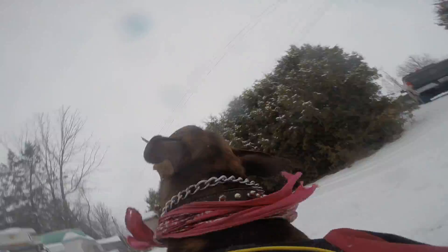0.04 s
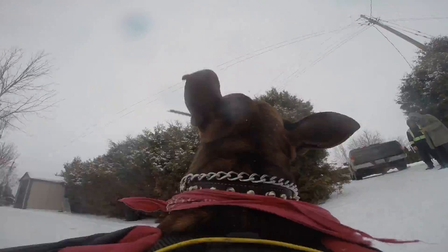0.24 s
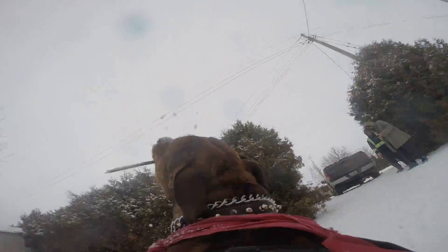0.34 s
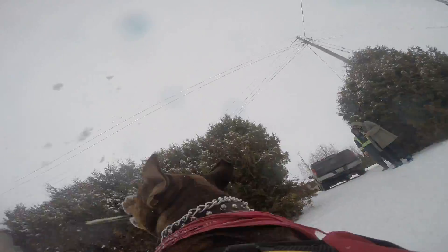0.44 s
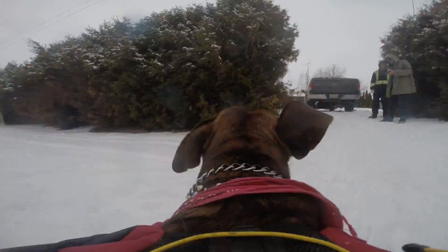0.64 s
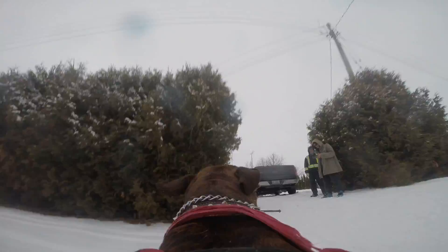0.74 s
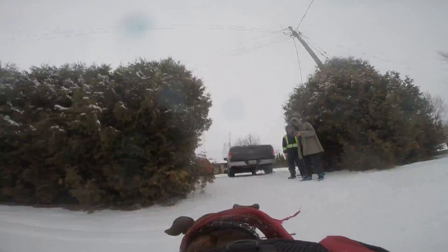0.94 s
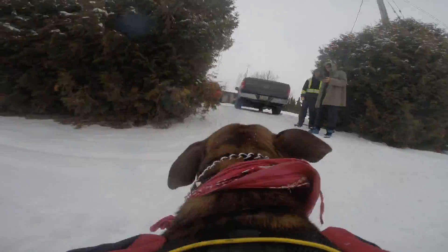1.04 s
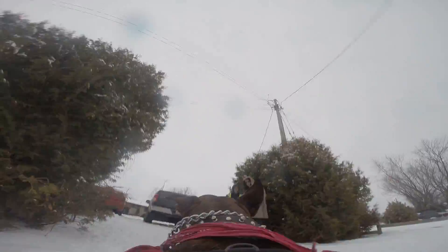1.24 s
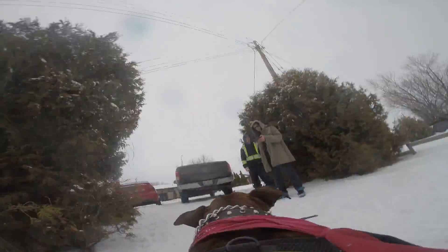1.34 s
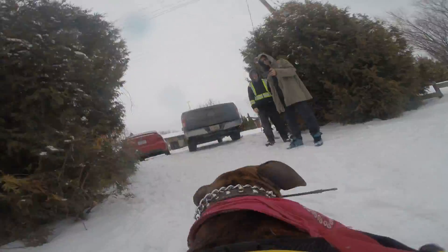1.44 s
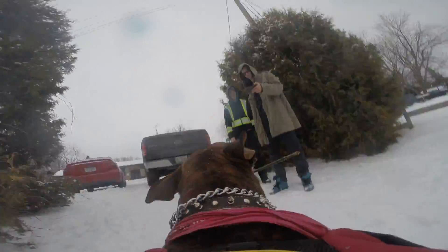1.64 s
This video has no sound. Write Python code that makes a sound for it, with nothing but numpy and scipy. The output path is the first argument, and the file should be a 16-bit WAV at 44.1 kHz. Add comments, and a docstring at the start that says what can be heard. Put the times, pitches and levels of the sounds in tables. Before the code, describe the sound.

Close thumps, knocks and harness rubbing from a camera riding on a moving dog.

```python
"""Rubbing, air rumble and deep thumps from a camera strapped to a dog trotting over snow.
Harness and fur rub on the plastic housing while air buffets the microphone.
Each stride jolts the mount; chain links tick lightly, and mount and chain collar
knock on the housing, ringing its modes."""
import sys
import numpy as np
from scipy import signal
from scipy.fft import rfft, irfft
from scipy.io import wavfile
from scipy.ndimage import uniform_filter1d, minimum_filter1d

SR = 44100
rng = np.random.default_rng(int(sys.argv[2]) if len(sys.argv) > 2 else 0)


def inscribe(sig):
    """Save sig as 16-bit PCM at rate SR to the path in sys.argv[1].

    A 1-D sig is mono; a 2-D sig holds one channel per row.
    Samples are clipped to [-1, 1] before scaling.
    """
    pcm = np.round(np.clip(np.atleast_2d(sig).T, -1, 1) * 32767)
    wavfile.write(sys.argv[1], SR, pcm.astype(np.int16))


N = 74970
T = np.arange(N) / SR
LEAD_S = .003  # graze ahead of each contact


def from_db(db):
    """Decibels to gain."""
    return 10 ** (np.asarray(db) / 20)


def rms_one(x):
    """Scale to rms 1."""
    return x / np.sqrt(np.mean(x ** 2) + 1e-20)


def add(out, start_s, x):
    """Mix x into out from start_s."""
    i = max(int(start_s * SR), 0)
    out[i:i + len(x)] += x[:N - i]


def coloured(x, spectrum):
    """Shape white x by (f/Hz, level/dB) points; rms 1."""
    hz, db = np.transpose(spectrum)
    bins_hz = np.maximum(np.fft.rfftfreq(N, 1 / SR), 1)
    gain = from_db(np.interp(np.log(bins_hz), np.log(hz), db))
    return rms_one(irfft(rfft(x) * gain, N))


def ring(force, hz, t60_s):
    """One resonance, scaled to the energy of 5 ms at rms 1."""
    r = from_db(-60 / (t60_s * SR))
    y = signal.lfilter([1, 0, -1], [1, -2 * r * np.cos(2 * np.pi * hz / SR), r * r], force + 1e-18)
    return y / np.sqrt(np.sum(y ** 2) / (.005 * SR))


def low_pass(x, hz, order=2):
    """Butterworth low-pass."""
    return signal.sosfilt(signal.butter(order, min(hz, SR / 2 - 1), fs=SR, output="sos"), x)


def friction():
    """Fibres catch and slip on the housing: grains plus noise, rms 1."""
    # rubbing spectrum: f/Hz, density/dB
    spectrum = [(100, 3.5), (350, 3), (480, 3), (610, -6.5), (735, 13), (860, -2.5), (1120, 0.5),
                (1500, 4.5), (2300, -1.5), (3200, -11.5), (4300, -17), (5200, -16.5), (5900, -26.5),
                (6900, -14.5), (8200, -34.5), (11000, -32.5), (15000, -48)]
    grains_per_s, grain_share = 1500, .56
    size_db = np.minimum(rng.exponential(1, N), 3)
    sizes = from_db(size_db) * rng.choice([-1, 1], N)
    grains = rms_one(sizes * (rng.random(N) < grains_per_s / SR))
    noise = rng.standard_normal(N)
    return coloured(np.sqrt(grain_share) * grains + np.sqrt(1 - grain_share) * noise, spectrum)


def harness():
    """The harness rubs steadily; its straps slip in sudden, duller scuffs."""
    # steady rubbing: t/s, relative level/dB
    rub_levels = [(0, -51), (.05, -56.5), (.15, -57), (.2, -47.5), (.28, -52.5), (.37, -58), (.45, -51.5),
                  (.56, -54), (.63, -49.5), (.67, -55.5), (.75, -47.5), (.81, -58), (.88, -60.5),
                  (.94, -63), (1.0, -57), (1.06, -62.5), (1.14, -52), (1.21, -55), (1.33, -57.5),
                  (1.37, -70), (1.43, -71.5), (1.48, -60.5), (1.7, -65.5)]
    # strap scuffs: t/s, relative level/dB, decay/s
    scuffs = [(.066, -41, 0.013), (0.115, -41.5, .005), (.174, -38.5, 0.019), (.21, -43, 0.0062),
              (0.231, -42, 0.016), (0.302, -40, 0.031), (.399, -45.5, 0.0091), (0.436, -41, 0.013),
              (0.489, -45.5, 0.028), (0.681, -39.5, 0.0074), (.701, -39.5, 0.03), (0.828, -44.5, 0.013),
              (0.882, -45.5, 0.016), (1.066, -44, 0.0045), (1.094, -46.5, 0.042), (1.171, -40, 0.019),
              (1.273, -40, 0.0056), (1.296, -43.5, .006), (1.327, -48.5, 0.016), (1.449, -53, 0.0088),
              (1.545, -47, 0.0093), (1.574, -50.5, 0.012)]
    rub_gain_db, scuff_gain_db, attack_s = 2.5, 3, .0015
    rub = from_db(rub_gain_db + np.interp(T, *np.transpose(rub_levels)))
    slip = np.zeros(N)
    for start_s, db, decay_s in scuffs:
        age_s = np.maximum(T - start_s, 0)
        rise = 1 - np.exp(-age_s / attack_s)
        slip += from_db(scuff_gain_db + db) * rise * np.exp(-(age_s / decay_s) ** 2)
    return rub * friction() + slip * low_pass(friction(), hz=3200)


def air():
    """Air buffets the microphone as the dog's back rises and falls."""
    # rumble spectrum: f/Hz, density/dB
    spectrum = [(15, 4), (30, -4.5), (55, -31.5), (90, -14), (170, -23), (260, -36.5), (500, -45.5),
                (1500, -91)]
    # rumble envelope: t/s, level/dB
    levels = [(0, -27), (.1, -34.5), (.19, -21.5), (.27, -24.5), (.39, -36), (.45, -18), (.53, -32),
              (.65, -36), (.72, -21), (.8, -35), (.88, -20.5), (.96, -33), (1.06, -36.5), (1.13, -30),
              (1.19, -36), (1.33, -33), (1.43, -42), (1.55, -33), (1.7, -37)]
    return from_db(np.interp(T, *np.transpose(levels))) * coloured(rng.standard_normal(N), spectrum)


def jolts():
    """The housing lurches: one slow push and pull of pressure per jolt."""
    # mount jolts: t/s, level/dB, f/Hz, build-up/cycles
    lurches = [(0.042, -31.5, 23, 0.92), (0.199, -12, 25.2, 0.44), (0.32, -1.5, 38.9, 0.51),
               (0.456, -10.5, 26.85, 0.22), (0.603, -17, 23, 0.17), (0.688, -19, 43.4, 0.17),
               (0.717, -7.5, 69, 0.15), (0.755, -9, 28, 1), (0.856, -3, 42.4, 0.15),
               (0.903, -24.5, 25.4, 0.76), (1.109, -6.5, 43.65, 0.095), (1.144, -14, 24.4, 0.26),
               (1.236, -25, 27, 0.68), (1.3415, -5, 37.3, 0.24), (1.555, -23.5, 38.6, 0.52)]
    decay_cycles = .73
    out = np.zeros(N)
    for centre_s, db, hz, rise_cycles in lurches:
        cycles = hz * (T - centre_s)
        envelope = np.exp(-(cycles / np.where(cycles < 0, rise_cycles, decay_cycles)) ** 2)
        out -= from_db(db) * np.sin(2 * np.pi * cycles) * envelope
    return out


def contact(chatter_s, size=4096):
    """Force of one blow: brief graze, impact, dying micro-bounces, faint buzz."""
    rise_s, buzz_db, buzz_s = .00041, -44, .012
    lead = int(LEAD_S * SR)
    t = (np.arange(size) - lead) / SR
    graze = np.exp(-abs(t) / rise_s)
    chatter = np.exp(-abs(t) / chatter_s)
    buzz = from_db(buzz_db) * np.exp(-abs(t) / buzz_s)
    force = rng.standard_normal(size) * np.where(t < 0, graze, chatter + buzz)
    force[lead] += 3.9  # impact
    return force


def chain():
    """Links touch with tiny bright ticks; now and then one rings free."""
    # link contacts: t/s, level/dB
    ticks = [(0.069, -72), (0.185, -85), (0.3254, -60), (0.327, -66), (0.334, -55.5), (0.432, -69),
             (0.519, -60), (0.7218, -56), (0.8633, -56), (0.866, -60), (1.11, -75), (1.346, -67),
             (1.3462, -52), (1.353, -69.5), (1.622, -74)]
    # link modes: f/Hz, relative level/dB, t60/s
    modes = [(5200, -2, 0.0013), (6660, -6.5, 0.0031), (9000, -22.5, .003), (11600, -12.5, 0.0024)]
    # freely ringing links: t/s, level/dB
    pings = [(0.086, -68), (1.11, -80.5)]
    out = np.zeros(N)
    for start_s, db in ticks:
        force = contact(chatter_s=.0004)
        tick = sum(from_db(mode_db) * ring(force, hz, t60_s) for hz, mode_db, t60_s in modes)
        add(out, start_s - LEAD_S, from_db(db) * tick)
    ping = ring(signal.unit_impulse(SR // 10), hz=11300, t60_s=.065)
    for start_s, db in pings:
        add(out, start_s, from_db(db) * ping)
    return low_pass(out, hz=13000, order=4)


def knocks():
    """Each blow rings the housing and pushes the mount into a short dull thud."""
    # blows: t/s, chatter/s, wall pitch ratio before clipping, thud/dB, six register levels/dB
    blows = [(0.1431, 0.00066, 1.06, -25.5, -61, -31, -39.5, -37, -57.5, -124),
             (0.1492, 0.0016, 0.87, -20, -41, -37, -30.5, -26, -87, -84),
             (0.3107, 0.0044, 0.987, -20, -28, -24.5, -66, -39.5, -42.5, -58),
             (0.4245, 0.0081, 1.12, -34.5, -47, -45, -27, -39.5, -54.5, -66),
             (0.73, 0.0013, 0.84, -39, -8.5, -15.5, -15.5, -18, -39, -71),
             (0.7312, 0.00086, 1.137, -5.5, -22.5, -17.5, -20, -25, -53, -77),
             (0.7385, 0.00072, .98, -52, -41, -32, -15.5, -22, -14, -30.5),
             (0.7407, .0005, 1.1, -18, -38, -32.5, -26, -24, -23, -32),
             (0.8452, 0.0014, .97, -10, -39, -20, -23, -25, -28.5, -42),
             (0.854, 0.0029, 1.016, -12, -30.5, -24.5, -32, -18, -79, -52.5),
             (0.8957, 0.0025, 1.05, -52, -55, -42, -40, -39, -52, -59.5),
             (1.1133, 0.0028, 1.15, -51, -48.5, -34.5, -28.5, -42, -57.5, -88),
             (1.1232, 0.0015, 0.996, -10, -25.5, -18, -11, -20, -37.5, -84.5),
             (1.3372, 0.00015, 1.082, -6, -9, -19, -10, -19, -25, -35.5),
             (1.3411, 0.0023, 0.66, -17.5, -40, -40.5, -27, -35.5, -54, -50.5),
             (1.3482, 0.0013, 0.93, -34.5, -39.5, -49, -35, -44, -53.5, -43.5),
             (1.5543, .002, 1.3, -30.5, -54, -43, -50, -50.5, -77, -94.5),
             (1.614, 0.0019, 0.93, -40, -67.5, -61, -68, -68, -80.5, -87)]
    # register centres (boxy, low, hollow, middle, high, top): f/Hz
    registers_hz = [400, 750, 1550, 2500, 6500, 11000]
    # housing modes: f/Hz, relative level/dB, t60/s
    modes = [(322, 0.5, 0.004), (487, 0, 0.017), (721, -1.5, 0.035), (867, -0.5, 0.01), (1442, -2.5, 0.017),
             (1870, -0.5, 0.0052), (2150, 0.5, 0.0058), (2700, -2, 0.0051), (3740, -7, 0.0096),
             (4970, -7, 0.0086), (6615, -3.5, 0.0049), (7120, -3.5, .008), (8950, -6.5, 0.0022),
             (10800, -8, .004), (12200, -8, 0.0025)]
    mode_gain_db, wall_top_hz = -3.5, 2400
    mount = ring(signal.unit_impulse(SR // 10), hz=144, t60_s=.035)
    thud = low_pass(mount, hz=334)
    out = np.zeros(N)
    for start_s, chatter_s, pitch, thud_db, *register_db in blows:
        force = contact(chatter_s)
        wall_ratio = np.clip(pitch, .96, 1.15)  # wall modes shift with the load on the mount
        add(out, start_s, from_db(thud_db) * thud)
        for k, (hz, db, t60_s) in enumerate(modes):
            drive_db = np.interp(np.log(hz), np.log(registers_hz), register_db)
            loaded_hz = hz * wall_ratio if hz < wall_top_hz else hz
            mode = low_pass(ring(force, loaded_hz, t60_s), 2 * hz)
            polarity = (-1) ** (k + 1)
            add(out, start_s - LEAD_S, polarity * from_db(mode_gain_db + db + drive_db) * mode)
    return out


def scene():
    """All sources right at the microphone, in dry open air, over a faint hiss; mono."""
    hiss = from_db(-83) * low_pass(rng.standard_normal(N), hz=8900)
    return (knocks() + jolts() + chain() + harness() + air() + hiss)[None]


def record(dry):
    """A fast limiter holds the hardest peaks; a steep low-pass cuts the top."""
    ceiling, window_s, stop_hz = .99, .003, 17800
    span = int(window_s * SR)
    needed_gain = ceiling / np.maximum(np.abs(dry), ceiling)
    gain = uniform_filter1d(minimum_filter1d(needed_gain, span), span)
    return signal.sosfilt(signal.cheby2(12, 70, stop_hz, fs=SR, output="sos"), gain * dry)


dry = scene()
out = record(dry)
inscribe(out)
```